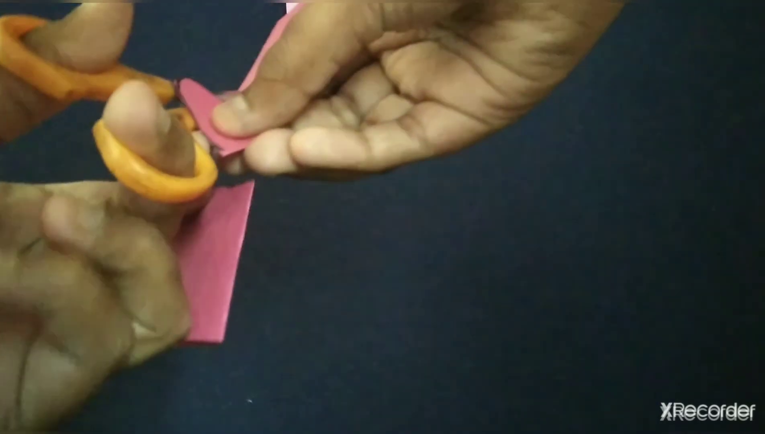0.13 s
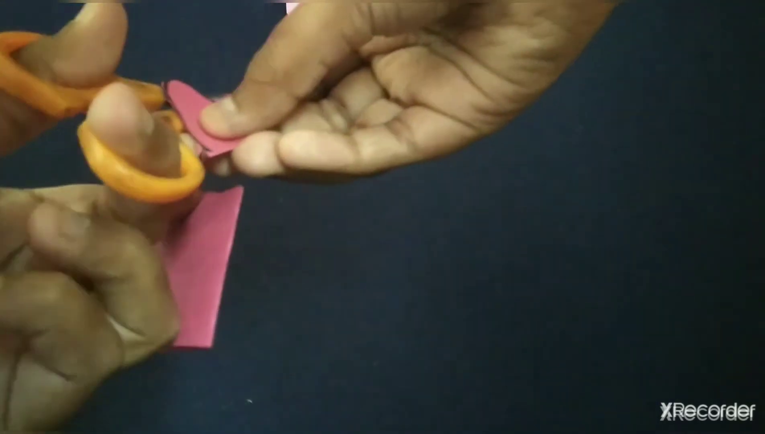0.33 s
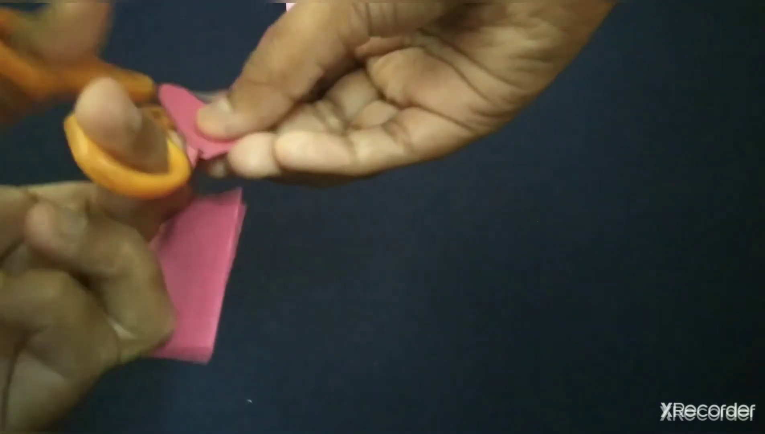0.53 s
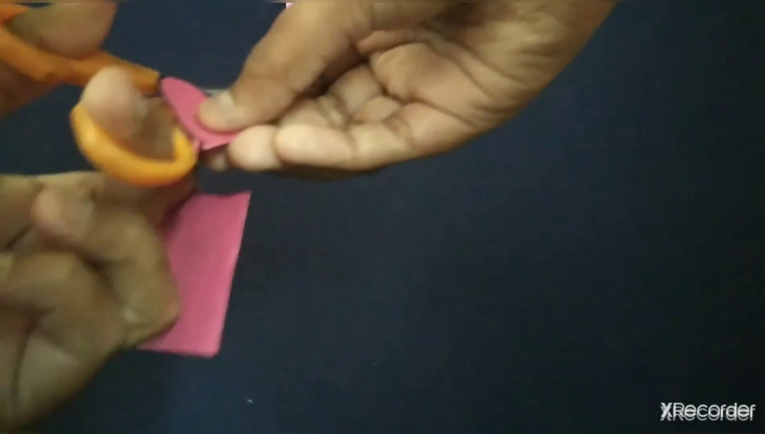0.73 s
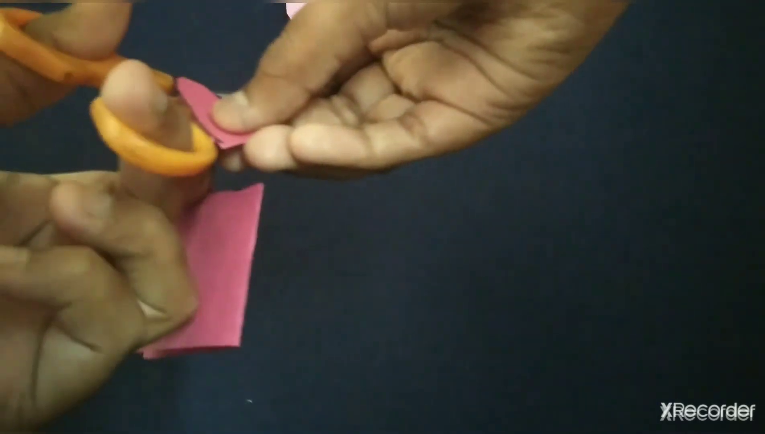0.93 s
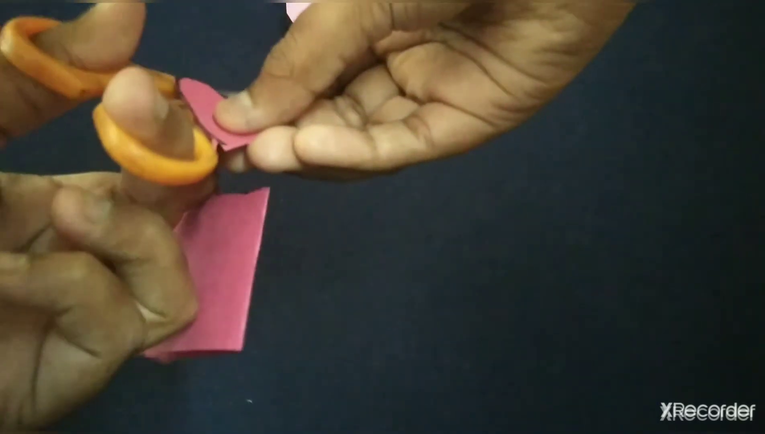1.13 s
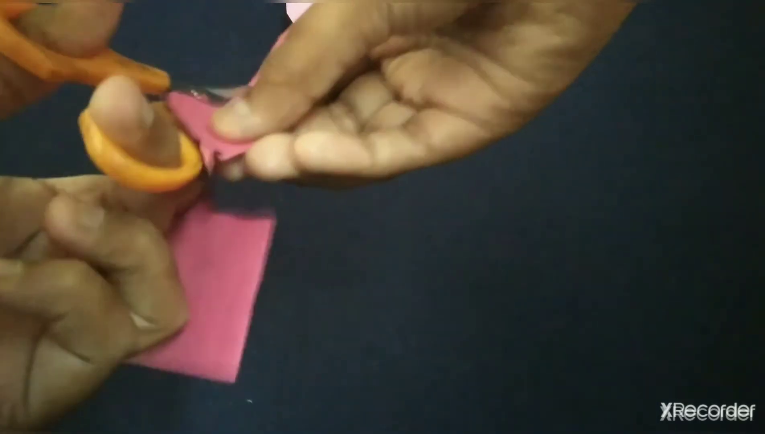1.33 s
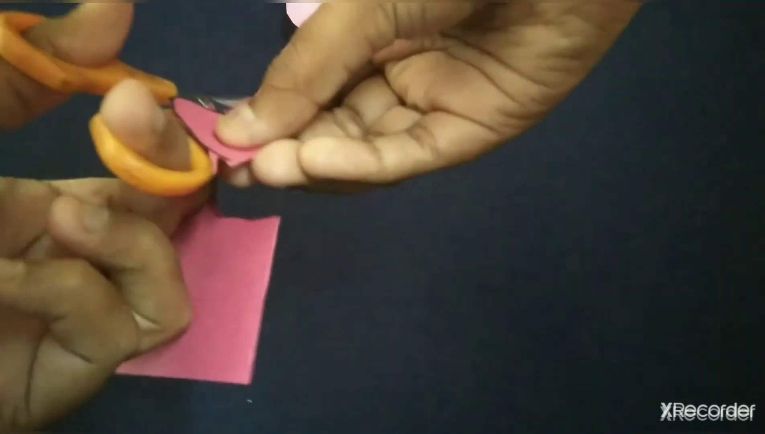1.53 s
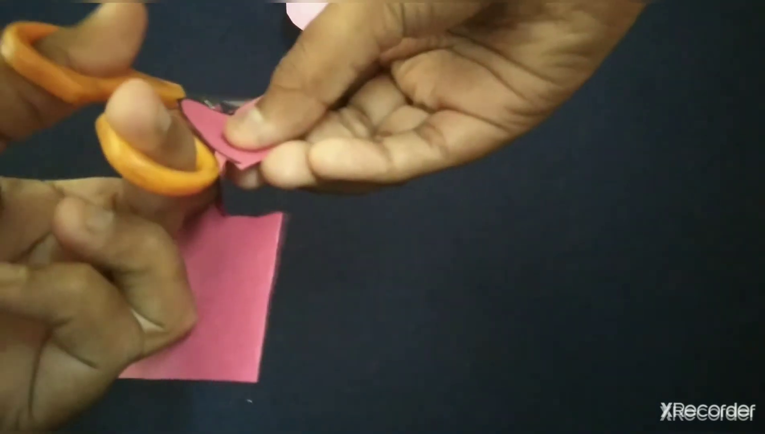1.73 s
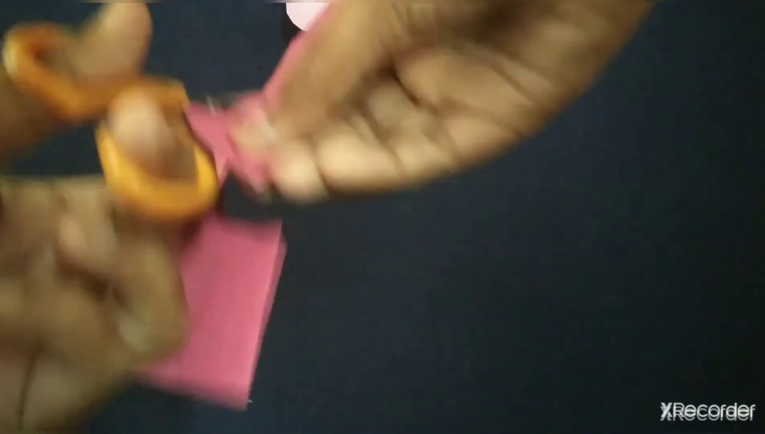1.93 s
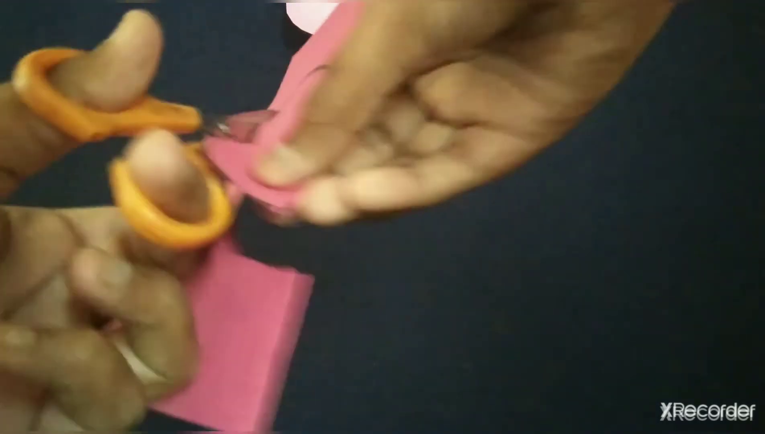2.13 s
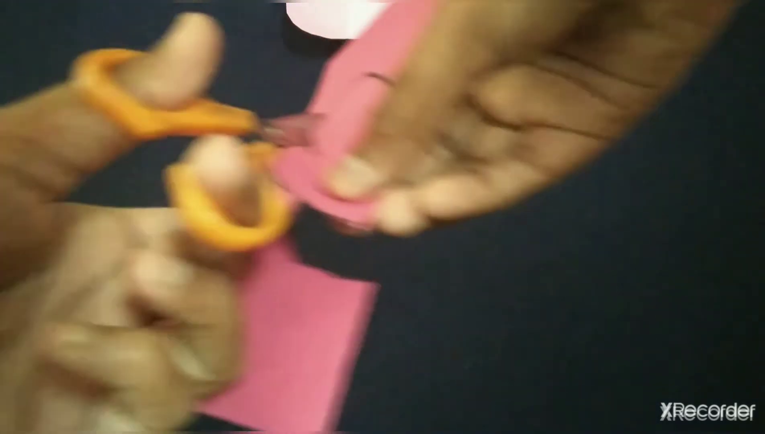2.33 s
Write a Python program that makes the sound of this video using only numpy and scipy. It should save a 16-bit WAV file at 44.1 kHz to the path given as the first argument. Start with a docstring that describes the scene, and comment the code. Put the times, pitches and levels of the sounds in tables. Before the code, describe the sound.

Small scissors snip through craft paper in short, sharp, crackling cuts, close up in a quiet room

```python
"""Small scissors snip craft paper close to the two microphones of a phone in a quiet room.
The blades stick and tear forward in jolts: short noise bursts ring the scissors and crackle the paper.
Each stroke also rubs blade on blade, a swell of dense tiny slips that hisses and rings with speed.
Handles knock dully, the paper ticks in the fingers, and table and walls add a short tail.
A fan rumbles low in the room as shaped noise; the hand bumps the table once, a brief low sine."""
import sys
import numpy as np
from scipy import signal
from scipy.fft import rfft, irfft
from scipy.io import wavfile
from scipy.ndimage import uniform_filter1d

SR = 44100
rng = np.random.default_rng(int(sys.argv[2]) if len(sys.argv) > 2 else 0)


def dump_mix(stems):
    """Bounce the given channels to the path in sys.argv[1] as a 16-bit WAV at rate SR."""
    frames = np.atleast_2d(stems).T  # one column per channel
    limited = np.clip(frames, -1, 1)  # hard clip at full scale
    pcm = np.round(limited * 32767).astype(np.int16)
    wavfile.write(sys.argv[1], SR, pcm)


def how_loud(loudness_db):
    """Turn decibels into a plain amplitude multiplier (0 dB gives 1, 20 dB gives 10)."""
    steps = np.asarray(loudness_db, float) / 20
    return 10 ** steps


N = 110250

# lower resonances of the scissors: (frequency [Hz], width [Hz], relative level [dB])
LOWER_MODES = [(790, 120, -7), (935, 110, -2), (1110, 120, 0), (1300, 160, -12)]
# upper resonances of the scissors: (frequency [Hz], width [Hz], relative level [dB])
UPPER_MODES = [(1460, 305, -3.5), (1858, 243, 3), (2076, 280, -2.5), (2740, 242, -19)]


def evened(x):
    """Scales to rms 1."""
    return x / np.sqrt(np.mean(x ** 2) + 1e-20)


def topped(x):
    """Scales each path to peak 1."""
    return x / (abs(x).max(axis=-1, keepdims=True) + 1e-20)


def read(points, hz):
    """Reads a table on a log-frequency axis."""
    f, value = np.transpose(points)
    return np.interp(np.log(hz + 1), np.log(f + 1), value)


def add(mix, s, sound):
    """Mixes a sound in at s seconds."""
    part = mix[..., round(s * SR):][..., :sound.shape[-1]]
    part += sound[..., :part.shape[-1]]


def ports(a, b, same, balance):
    """Two microphone ports: the right one hears path a partly replaced by another path b."""
    hz = np.fft.rfftfreq(N, 1 / SR)
    likeness = np.clip(read(same, hz), 0, 1)
    tilt = how_loud(read(balance, hz) / 2)
    a, b = rfft(a), rfft(b)
    left = a * tilt
    right = (likeness * a + np.sqrt(1 - likeness * likeness) * b) / tilt
    return irfft(np.array([left, right]), N)


def fan():
    """Low rumble and soft air noise: coloured random spectra whose level drifts in patches."""
    # colour of the fan: (frequency [Hz], relative level [dB])
    colour = [(12, -49.5), (25, -11), (38, -22), (57, 6.85), (75, -13), (95, -19.5), (119, 1.6),
              (131, -7.5), (145, 0), (175, -10.5), (250, -20), (330, -15), (500, -19.5), (800, -21),
              (1200, -23.5), (2000, -29), (2600, -40), (3300, -59.5), (4500, -61), (16000, -62)]
    # likeness of the two ports: (frequency [Hz], left-right likeness [0-1])
    same = [(60, .92), (240, .88), (600, .55), (1500, .15), (15000, .2)]
    # balance of the two ports: (frequency [Hz], left minus right [dB])
    balance = [(40, -3.5), (240, -.5), (950, 2.5), (3770, 3), (15000, 0)]
    level_db, patch_db = -52.5, 1  # rms ahead of the ports, rms of the level drift
    frames, hz = N // 1024 + 5, np.fft.rfftfreq(4096, 1 / SR)
    a, b, patches = rng.standard_normal((frames, len(hz), 2, 3)).T
    patches = uniform_filter1d(patches[0], size=12, axis=0)  # smooth over frequency
    patches = evened(uniform_filter1d(patches, size=4, axis=1))  # smooth over time
    shape = how_loud(read(colour, hz)[:, None] + patch_db * patches)
    spectra = np.array([a[0] + 1j * a[1], b[0] + 1j * b[1]]) * shape
    paths = evened(signal.istft(spectra, nperseg=4096, noverlap=3072)[1][:, :N])
    return how_loud(level_db) * ports(*paths, same, balance)


def bump():
    """One soft low thump through the table: a sine under a half-sine swell."""
    time_s, pitch_hz, level_db, length_s = .668, 58, -38, .045
    out, t = np.zeros(N), np.arange(0, length_s, 1 / SR)
    swell = np.sin(np.pi * t / length_s)
    add(out, time_s, how_loud(level_db) * swell * np.sin(2 * np.pi * pitch_hz * t))
    return out


def room(x):
    """A short diffuse tail of the table and walls: decaying noise as an impulse response."""
    t60_s, level_db = .09, -13
    t = np.arange(6000) / SR
    tail = rng.standard_normal((2, len(t))) * how_loud(-60 * t / t60_s) * (t > .003)
    return how_loud(level_db) * signal.fftconvolve(x, tail / np.linalg.norm(tail[0]), axes=1)[:, :N]


def ring(x, modes):
    """Two-pole resonances, neighbours in opposite phase."""
    out = 0
    for k, (hz, width, db) in enumerate(modes):
        r, w = np.exp(-np.pi * width / SR), 2 * np.pi * hz / SR
        mode = signal.lfilter([(1 - r) * np.sin(w)], [1, -2 * r * np.cos(w), r * r], x)
        out = out + (-1) ** k * how_loud(db) * mode
    return out


def hiss(x):
    """Colours noise or clicks with the spectrum of paper and blade hiss."""
    # colour of paper and blades: (frequency [Hz], relative level [dB])
    colour = [(800, -40), (2300, -3.5), (3000, -4.5), (3600, -9.5), (6600, -8.5), (8000, -7.5), (9000, -14),
              (10900, -11), (13200, -22.5), (16000, -35)]
    hz = np.fft.rfftfreq(x.shape[-1], 1 / SR)
    return irfft(rfft(x) * how_loud(read(colour, hz)), x.shape[-1])


def thin(x):
    """Keeps only a band of treble."""
    return signal.sosfilt(signal.butter(5, [5300, 14100], "band", fs=SR, output="sos"), x)


def push(time_s, spiky=0):
    """A short burst of fibres snapping, swelling and falling, for two paths; spiky = a few snaps stand out."""
    stretch, roundness = 1.5, 2.2  # time to the top per time_s, exponent of the swell
    u = np.arange(8820) / SR / max(stretch * time_s, .0003)
    noise = rng.standard_normal((2, len(u)))
    return (u * np.exp(1 - u)) ** roundness * noise * abs(noise) ** spiky


def ticks():
    """Faint ticks and rustles of the paper in the fingers: treble bursts."""
    # bursts: (start [s], peak ahead of body filter and ports [dB], time scale given to push [s])
    events = [(1.993, -72.5, .006), (2.051, -66, .002), (2.112, -55.5, 0.03), (2.411, -66, 0.0043)]
    out = np.zeros((2, N))
    for s, db, time_s in events:
        add(out, s, how_loud(db) * topped(thin(hiss(push(time_s))[:, :8000])))
    return out


def knocks():
    """Dull knocks of the handles: a push rings one low resonance."""
    # knocks: (start [s], peak ahead of body filter and ports [dB], time scale given to push [s])
    events = [(.308, -32.5, 0.0026), (.54, -32.5, 0.0077), (.573, -27.5, 0.0014), (.585, -41.5, 0.0075),
              (.605, -38.5, 0.001), (1.092, -36, 0.006), (1.315, -28.5, .007), (1.696, -27.5, 0.0047),
              (1.757, -36.5, 0.0033)]
    handle = [(505, 65, 0)]  # (frequency [Hz], width [Hz], level [dB])
    out = np.zeros((2, N))
    for s, db, push_s in events:
        add(out, s, how_loud(db) * topped(ring(push(push_s), handle)))
    return out


def stroke_db(t, start, fastest, end):
    """How far a stroke lies under its fastest moment."""
    depth_db, bend = 32.5, 1.906  # drop reached at start and end, flatness of the top
    rising = (fastest - t) / (fastest - start)
    falling = (t - fastest) / (end - fastest)
    away = np.where(t < fastest, rising, falling)
    return -depth_db * np.minimum(away, 4) ** bend


def rubbing():
    """Dense tiny slips under each stroke: hiss, and the scissors ringing along with speed."""
    # blade over blade: (start [s], fastest [s], end [s], hiss level [dB], upper ring level [dB]),
    # levels at the fastest moment, ahead of body filter and ports
    strokes = [(0.199, 0.324, .43, -54, -48.5), (0.488, 0.538, 0.6354, -46, -40),
               (1.04, 1.107, 1.19, -49.5, -45.5), (1.26, 1.314, 1.42, -45.5, -42.5),
               (1.636, 1.701, 1.753, -48.5, -43.5), (1.717, 1.762, 1.84, -53.5, -52),
               (2.101, 2.143, 2.24, -68, -55.5)]
    grains_per_s, spread_db = 2900, 2  # spread per unit of an exponential draw
    lower_db, lower_steep = -2.5, 3.3  # the lower ring wakes only at speed
    # the contact point travels along the blades: high ring first, low ring last
    upper_lead_s, lower_lag_s = .004, .014
    t = np.arange(N) / SR
    draw, noise = rng.random((2, N)), rng.standard_normal((2, N))
    spread = np.minimum(rng.exponential(1, (2, N)), 4)
    grains = evened(how_loud(spread_db * spread) * np.sign(noise) * (draw < grains_per_s / SR))
    air = upper = lower = 0
    for start, fastest, end, hiss_db, ring_db in strokes:
        air = air + how_loud(hiss_db + stroke_db(t, start, fastest, end))
        upper = upper + how_loud(ring_db + stroke_db(t + upper_lead_s, start, fastest, end))
        late_db = stroke_db(t - lower_lag_s, start, fastest, end)
        lower = lower + how_loud(ring_db + lower_db + lower_steep * late_db)
    air_sound = air * evened(hiss(noise + .27 * grains))
    upper_sound = ring(upper * grains, UPPER_MODES) / np.std(ring(grains, UPPER_MODES))
    lower_sound = ring(lower * grains, LOWER_MODES) / np.std(ring(grains, LOWER_MODES))
    return air_sound + upper_sound + lower_sound


def jolts():
    """The blades stick, then tear forward: each jolt rings both mode groups and crackles the paper."""
    # jolts: (time [s], lower ring peak ahead of body filter and ports [dB], upper ring re lower [dB],
    # paper crackle re lower [dB], tear time scale given to push and lead of the burst start [s])
    events = [(0.233, -43.5, 2, -5, 0.0024), (.243, -29, 0.5, -13, 0.0012),
              (0.246, -24.5, 1.5, -12.5, 0.0019), (0.277, -25.5, -2.5, -23, 0.0016),
              (0.306, -23.5, 1.5, -4.5, 0.00083), (.309, -12.5, -5.5, -11, 0.001),
              (.314, -22.5, -6, -8, 0.001), (0.331, -34, 4, -23, 0.0017), (.340, -26, 2.5, -7, 0.0011),
              (.345, -33, -16, -25, 0.0048), (0.37, -29, -0.5, -1.5, 0.0014),
              (.511, -48.5, 14, -11, 0.0031), (.532, -37.5, 12.5, -18, 0.00171),
              (.553, -44, 16.5, -26, 0.00053), (.574, -27, 1.5, -4.5, 0.0012),
              (.585, -32.5, -2.5, -2, 0.0044), (1.063, -24.5, -8, -14.5, 0.0012),
              (1.068, -17.5, -7, -18, .0012), (1.087, -21.5, -5, -10.5, 0.0016),
              (1.09, -14, -28, -11, .0018), (1.121, -32, 4.5, 1.5, 0.0014), (1.144, -41.5, 0.5, 4.5, .0015),
              (1.289, -43.5, 1.5, -10, 0.0033), (1.32, -43, 12, -8, .001), (1.328, -46.5, 15, 7, 0.00098),
              (1.34, -47, 0, 17, 0.0019), (1.347, -58, -5, -7, .0015), (1.377, -57.5, 12, -2.5, 0.0025),
              (1.66, -36.5, -5, -9, .003), (1.666, -22, -1, -19, 0.0029), (1.692, -24.5, -8, -6, 0.0018),
              (1.696, -21.5, -8, 1.5, 0.0016), (1.732, -38.5, -14, 10.5, 0.0017),
              (1.754, -35, 6, 6.5, 0.0032), (1.762, -33, -2, 5.5, 0.0021)]
    crackle_lag_s = .0015  # the paper parts just after the blades jump
    # a jolt is too quick to push the modes from below
    snap_edge = signal.butter(3, 720, "high", fs=SR, output="sos")
    out = np.zeros((2, N))
    for s, db, upper_db, crackle_db, tear_s in events:
        snap = signal.sosfilt(snap_edge, push(tear_s))
        lower = topped(ring(snap, LOWER_MODES))
        upper = how_loud(upper_db) * topped(ring(snap, UPPER_MODES))
        add(out, s - tear_s, how_loud(db) * (lower + upper))
        crackle = hiss(push(1.1 * tear_s, spiky=2.2))[:, :4000]
        add(out, s - tear_s + crackle_lag_s, how_loud(db + crackle_db) * topped(crackle))
    return out


def scissors():
    """Scissors and paper close to the ports; the small body radiates little bass."""
    # likeness of the two ports: (frequency [Hz], left-right likeness [0-1])
    same = [(60, 0.47), (500, 0.85), (1000, 0.47), (2000, 0.45), (4000, 0.21), (15000, .1)]
    # balance of the two ports, ahead of the drift: (frequency [Hz], left minus right [dB])
    balance = [(130, -.6), (290, 4), (640, 4), (1100, 7), (2200, 1.5), (6000, 7.5), (10500, -4.5),
               (15000, -9.5)]
    # the scissors drift across the ports: (time [s], added left minus right [dB])
    path = [(.2, 1), (.6, -1), (1.1, 1), (1.3, -3), (1.7, -3), (2.2, -3)]
    drift = how_loud(np.interp(np.arange(N) / SR, *np.transpose(path)) / 2)
    body_edge = signal.butter(2, 496, "high", fs=SR, output="sos")
    body = signal.sosfilt(body_edge, ticks() + knocks() + rubbing() + jolts())
    return ports(*body, same, balance) * [drift, 1 / drift]


def scene():
    """Scissors near the ports, their short room tail, the fan and the bump."""
    near = scissors()
    return fan() + bump() + room(near) + near


def top_cut(x):
    """Nothing passes above the cut-off."""
    return signal.sosfilt(signal.butter(12, 16400, fs=SR, output="sos"), x)


def record(dry):
    """The finished mix as the phone stores it."""
    return top_cut(dry)


dry = scene()
out = record(dry)
dump_mix(out)
```